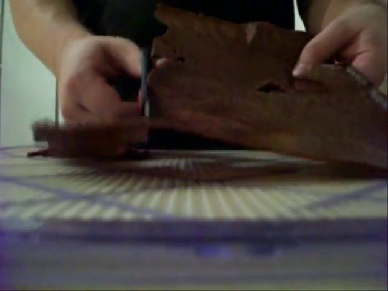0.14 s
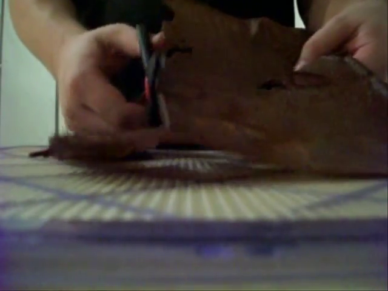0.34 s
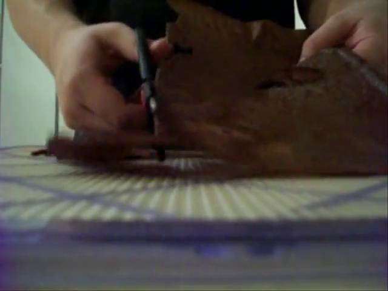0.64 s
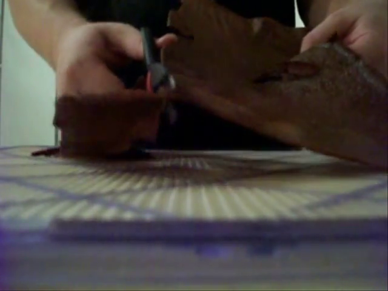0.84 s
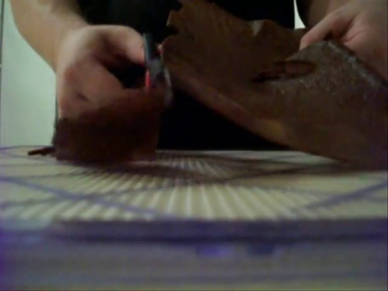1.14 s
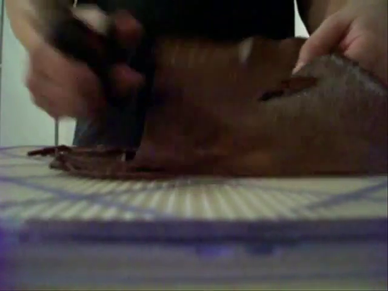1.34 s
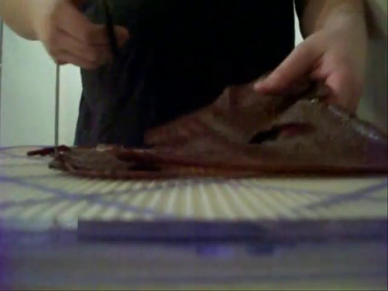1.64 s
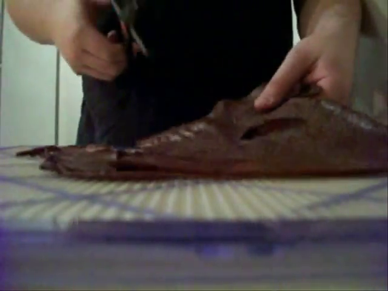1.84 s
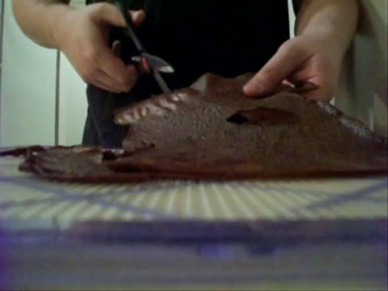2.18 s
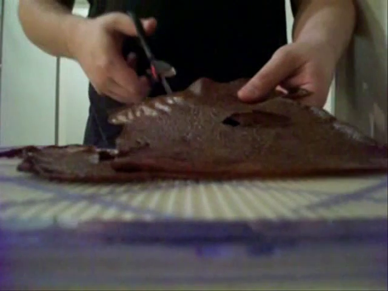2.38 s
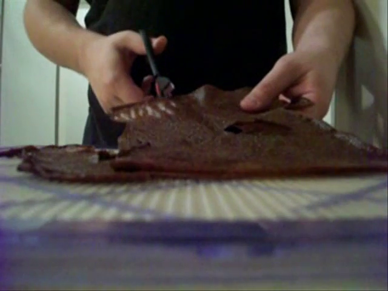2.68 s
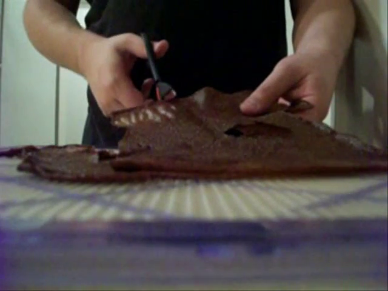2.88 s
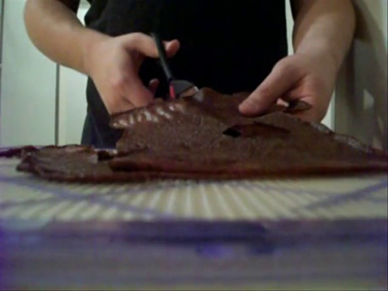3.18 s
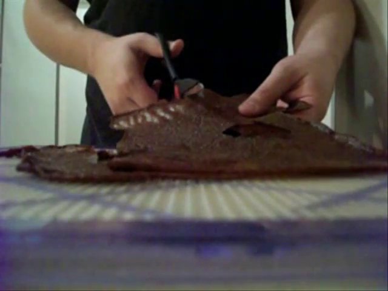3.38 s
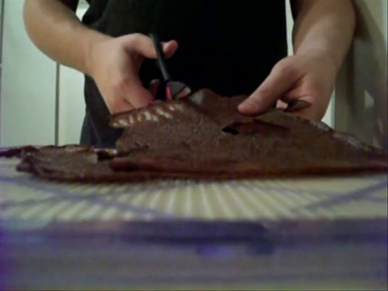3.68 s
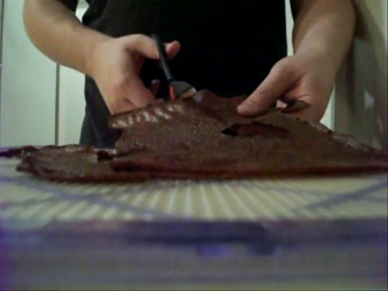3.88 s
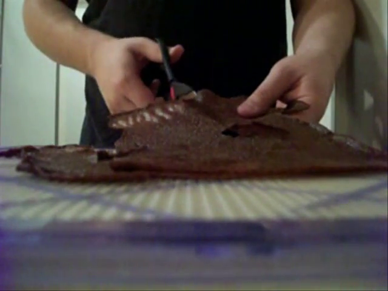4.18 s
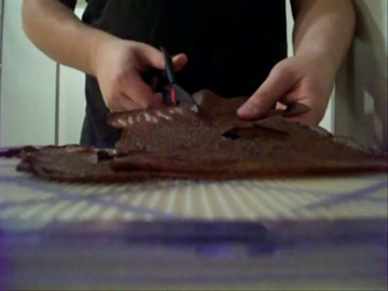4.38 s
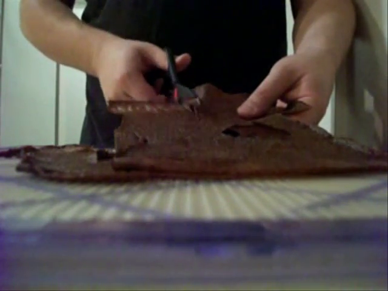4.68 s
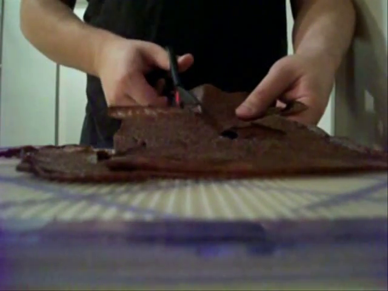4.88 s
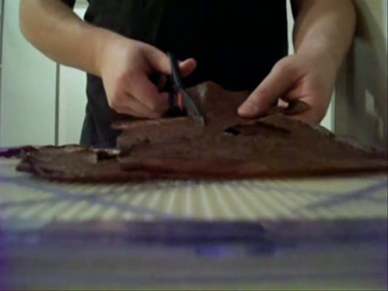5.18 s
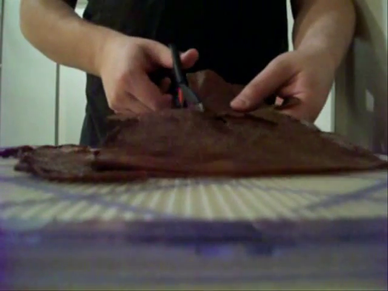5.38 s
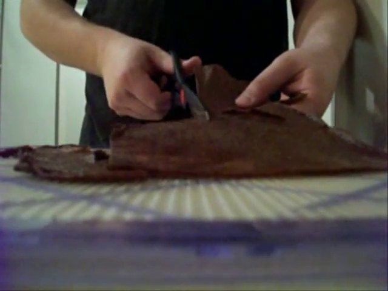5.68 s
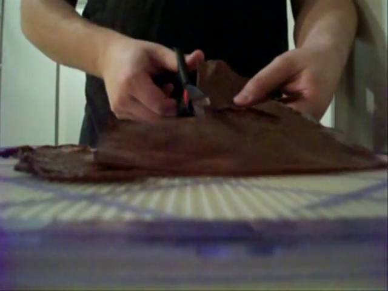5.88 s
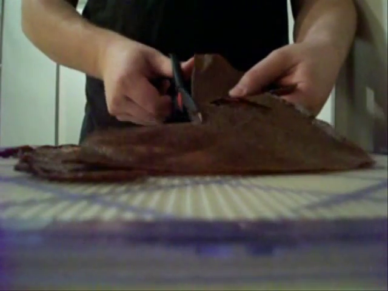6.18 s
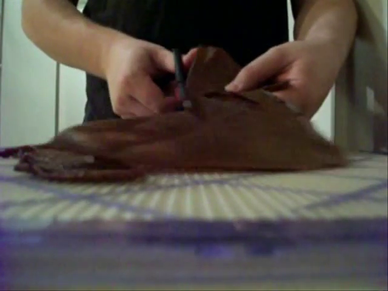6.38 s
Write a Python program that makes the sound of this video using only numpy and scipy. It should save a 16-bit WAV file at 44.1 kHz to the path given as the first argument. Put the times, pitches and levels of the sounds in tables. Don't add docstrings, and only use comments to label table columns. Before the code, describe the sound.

A close, muffled microphone in a small room picks up a steady dull hum with soft hiss. From 0 s a stiff dried fruit sheet rustles and open shears scrape it lightly, while the plastic tray bumps low. At 0.53 s the blades snap shut, so loud it distorts, and the tray drums deeply. A short, dry squeak of the pivot comes around 0.8 s. At 1.24 and 1.29 s two more hard clacks fall almost together with a softer tray slap. Light slides and bumps continue to about 2.3 s. Between 2.6 and 3.85 s, short crunchy bites part coarse fibres, separated by near quiet. At 4.36 s a rapid metallic scuff is followed by another bite at 4.5 s. From 5.1 s a hard tap leads into closely spaced gritty tearing cuts, steel scrapes, small ticks and low thumps until the end at 6.5 s.

```python
import sys
import numpy as np
from scipy import signal
from scipy.fft import rfft, irfft, next_fast_len
from scipy.io import wavfile
from scipy.ndimage import map_coordinates

SR = 44100
rng = np.random.default_rng(int(sys.argv[2]) if len(sys.argv) > 2 else 0)


def amplitude_ratio(level_db):
    exponent = np.asarray(level_db, float) / 20
    return 10 ** exponent


def file_out(sig):
    cols = np.atleast_2d(sig).T
    lim = np.clip(cols, -1, 1)
    pcm = np.round(lim * 32767).astype(np.int16)
    wavfile.write(sys.argv[1], SR, pcm)


N = 288193


def unit(x):
    return x / np.sqrt(np.mean(x ** 2) + 1e-20)


def along(points, hz):
    f, v = np.transpose(points)
    return np.interp(np.log(hz + 1), np.log(f + 1), v)


def curves(rows):
    s, *cols = np.transpose(rows)
    return [np.interp(np.arange(N) / SR, s, c) for c in cols]


def wobble(rate):
    knots = rng.standard_normal(int(N * rate / SR) + 4)
    return map_coordinates(knots, [np.arange(N) * rate / SR])


def filtered(x, response):
    m = next_fast_len(len(x) + 8192)
    return irfft(rfft(x, m) * response(np.fft.rfftfreq(m, 1 / SR)), m)[:len(x)]


def resonant(x, modes):
    def response(f):
        return sum((-1) ** k * amplitude_ratio(db) * 1j * f * width / (hz * hz - f * f + 1j * f * width)
                   for k, (hz, width, db) in enumerate(modes))
    return filtered(x, response)


def grit(rate, spread_db, clump_db):
    size_db = spread_db * np.minimum(rng.exponential(size=N), 3)
    breaks = rng.random(N) < rate / SR
    clicks = breaks * amplitude_ratio(size_db) * rng.standard_normal(N)
    rubbing = 0.69 * rng.standard_normal(N)
    return (unit(clicks) + rubbing) * amplitude_ratio(clump_db * wobble(90))


def swell(start, rise, fall, ends_db, bend=1):
    t = np.arange(N) / SR - start
    gate = np.clip(np.minimum(t / .003, 1 + (rise + fall - t) / .012), 0, 1)
    away = np.interp(t, [0, rise, rise + fall], [-1, 0, 1])
    return gate * amplitude_ratio(np.where(away < 0, *ends_db) * np.abs(away) ** bend)


def add(track, s, sound):
    part = track[round(s * SR):][:len(sound)]
    part += sound[:len(part)]


# (frequency [Hz], level [dB per Hz])
HUM = [(8.8, -36.5), (15, -1.5), (33, -12.5), (49, -9.5), (101, -21.5), (250, -24), (620, -34), (2000, -61)]
# (frequency [Hz], level [dB per Hz])
HISS = [(100, -51), (500, -34.5), (1200, -32.5), (2690, -34.5), (5200, -38.5)]


def room():
    def colour(hz):
        hum = amplitude_ratio(along(HUM, hz) - 40 * (hz < 12))
        return np.hypot(hum, amplitude_ratio(along(HISS, hz)))
    return amplitude_ratio(-34 + 0.22 * wobble(3.1)) * unit(filtered(rng.standard_normal(N), colour))


# (start [s], rise [s], fall [s], rubbing level [dB], steel over rubbing [dB])
SLIDES = [(0, 0.065, 0.017, -35, -5.5), (.075, 0.017, 0.055, -52.5, 10.5), (.16, 0.067, 0.13, -38, -1.5),
          (.345, 0.045, 0.045, -35, 2), (.45, 0.062, 0.018, -34, 5), (.535, 0.011, 0.16, -31, -2),
          (.64, 0.077, 0.16, -35, -1.5), (.905, 0.034, 0.031, -37, -3), (1.01, 0.045, 0.14, -38, -2.5),
          (1.298, 0.009, 0.15, -45.5, 6), (1.4, 0.095, .085, -41, -0.5), (1.77, .04, 0.085, -40.5, 0),
          (1.95, 0.057, 0.15, -40.5, 1), (2.148, 0.01, 0.024, -26.5, -7), (2.35, 0.052, 0.066, -42.5, 1),
          (4.398, 0.0064, 0.095, -43.5, 3), (4.66, 0.075, 0.33, -36.5, -2), (4.94, 0.073, 0.028, -40, -3),
          (5.766, 0.0073, 0.19, -39.5, -2)]
# (start [s], rise [s], fall [s], tearing level [dB], steel over tearing [dB])
CUTS = [
    (5.08, .06, 0.043, -40.5, -10),
    (5.254, 0.072, 0.022, -33.5, -5.5),
    (5.345, 0.053, 0.052, -33, -0.5),
    (5.455, 0.018, .063, -35.5, 1),
    (5.612, 0.039, 0.0197, -33, -6.5),
    (5.878, 0.044, 0.052, -33, -1.5),
    (5.955, 0.033, 0.093, -36, 0.5),
    (6.183, 0.017, 0.093, -36.5, -5),
    (6.375, 0.042, 0.064, -31, -5),
    (6.463, .032, 0.02, -34.5, 0.5),
]
# (frequency [Hz], width [Hz], level [dB])
SHEET = [(968, 420, -0.5), (1126, 193, 3.5), (1520, 108, 3.5), (1774, 89, 2), (2000, 304, -0.5)]
# (frequency [Hz], width [Hz], level [dB])
PIVOT = [(2377, 92, -2), (2883, 147, 1), (3070, 138, 1), (3642, 350, -0.5)]
# (frequency [Hz], width [Hz], level [dB])
EDGE = [(4020, 190, 1), (4570, 290, 6.5), (4640, 174, 7), (5554, 880, 0.5)]


def strokes():
    levels = np.zeros((3, N))
    for rows, ends_db, bend, pivot_db, edge_db in ((CUTS, (-6.5, -10), 1.25, 0, 3.5),
                                                   (SLIDES, (-13, -12), 0.99, -0.5, 0.5)):
        for s, rise, fall, db, steel_db in rows:
            gains = amplitude_ratio([[db], [db + steel_db + pivot_db], [db + steel_db + edge_db]])
            levels += swell(s, rise, fall, ends_db, bend) * gains
    fibres = grit(rate=1500, spread_db=-1.0, clump_db=1.5)
    steel = 0.4 * fibres + grit(rate=3000, spread_db=5.5, clump_db=2.0)
    sheet = resonant(resonant(fibres, SHEET), [(1420, 6400, 0)])
    pivot = resonant(resonant(steel, PIVOT), [(3220, 2800, 0)])
    edge = resonant(resonant(steel, EDGE), [(4670, 10000, 0)])
    return levels[0] * unit(sheet) + levels[1] * unit(pivot) + levels[2] * unit(edge)


# (time [s], level [dB])
WEIGHT = [(0, -36), (.5, -36), (.62, -30), (1.1, -38), (1.22, -37.5), (1.45, -39), (1.6, -41), (2.1, -35.5),
          (2.3, -43), (2.46, -38.5), (2.7, -45), (4.9, -41), (5.2, -44), (5.45, -39.5), (5.75, -46),
          (6.1, -39), (6.53, -38.5)]
# (start [s], rise [s], fall [s], drum level [dB], ribs over drum [dB])
BUMPS = [(.03, 0.03, 0.093, -35, -20), (0.319, 0.15, 0.098, -31, -3.5), (0.489, 0.03, .13, -31, 6),
         (.66, 0.037, 0.045, -35, 5), (0.799, .07, 0.091, -29.5, -8.5), (0.989, 0.092, 0.081, -30, -15),
         (1.232, 0.075, 0.09, -29.5, 3.5), (1.41, .03, 0.058, -40.5, 8.5), (1.46, 0.04, 0.046, -30, -13),
         (1.78, 0.053, 0.086, -28.5, -13), (2.09, 0.089, 0.044, -28.5, -23), (4.36, 0.033, .06, -40, 2.5),
         (4.96, 0.066, 0.024, -32, -5), (5.07, 0.011, 0.067, -41.5, 11), (5.279, 0.11, 0.12, -27.5, -9.5),
         (5.48, 0.052, 0.024, -25.5, -13), (5.63, 0.045, 0.03, -27, -18), (5.76, 0.039, 0.091, -33, -8),
         (5.88, .03, 0.05, -26, -1), (6, 0.016, 0.039, -22, -8.5), (6.04, 0.077, 0.053, -31, -19),
         (6.17, 0.047, 0.073, -41.5, 8), (6.22, 0.049, 0.042, -34, -0.5), (6.361, 0.067, 0.12, -34, 3.5)]
# (frequency [Hz], width [Hz], level [dB])
DRUM = [(85.6, 20.3, 4), (122.2, 45, -6)]
# (frequency [Hz], width [Hz], level [dB])
FLAP = [(155, 66, -1), (290, 61, -4.5)]
# (frequency [Hz], width [Hz], level [dB])
RIBS = [(424.4, 33, 0.5), (773.7, 13, -0.5), (1132.4, 6.5, 1), (580, 1100, -12)]


def drag():
    weight_db, = curves(WEIGHT)
    levels = amplitude_ratio([weight_db, weight_db - 8, weight_db - 5.5])
    for s, rise, fall, db, ribs_db in BUMPS:
        gains = amplitude_ratio([[db], [db - 5 + 0.53 * ribs_db], [db + ribs_db]])
        levels = np.hypot(levels, swell(s, rise, fall, ends_db=(-9, -10.5)) * gains)
    drum = resonant(resonant(rng.standard_normal(N), DRUM), [(100, 300, 0)])
    flap = resonant(resonant(rng.standard_normal(N), FLAP), [(199, 660, 0)])
    ribs = resonant(grit(rate=1500, spread_db=5.5, clump_db=2.5), RIBS)
    return levels[0] * unit(drum) + levels[1] * unit(flap) + levels[2] * unit(ribs)


# (time [s], peak level [dB], brightness [dB a step from tray to sheet to pivot to tips])
TRAY_TAPS = [
    (.349, -25.5, -1),
    (.91, -26, 4),
    (1.297, -16.5, -0.5),
    (1.367, -26, -3),
    (2.156, -25, -0.5),
    (5.081, -15.5, -0.5),
    (5.1, -27, 0),
    (5.466, -30.5, -3),
]
FIBRE_SNAGS = [(1.337, -24.5, 8.5), (1.651, -30.5, 5), (2.596, -33.5, -3), (2.742, -32, 5), (2.986, -38, 2),
               (3.014, -36, 14), (3.062, -28, 4), (3.558, -29.5, 5), (3.614, -29, 7.5), (3.625, -39, 5),
               (3.662, -34, -6), (3.754, -34, -3), (5.122, -27, 11.5), (5.131, -22.5, 3), (5.4, -25, 5),
               (5.654, -29, 4), (6.014, -24, 5), (6.414, -18, 5.5), (6.431, -21, 5), (6.2, -28, -6)]
BLADE_NICKS = [
    (.487, -37, -3),
    (.658, -18.5, 9),
    (1.263, -18.5, -3),
    (3.388, -44, -3),
    (4.111, -25, -4),
    (4.268, -29.5, 1),
    (4.532, -45, -1),
    (5.344, -33.5, -4),
    (5.621, -20.5, -2.5),
    (5.769, -37, 0),
]
BLADE_SCUFFS = [
    (4.358, -17, 0.5),
    (4.374, -22, 1),
    (4.383, -19.5, 0),
    (4.394, -16, 3),
]
# (frequency [Hz], width [Hz], level [dB])
KNOCK = [(463, 16, -7.5), (833, 19, -0.5)]


def ticks():
    out, t = np.zeros(N), np.arange(SR // 16) / SR
    nick_db = (-25.5, -11, -8, 2)
    for rows, shares_db, hold, t60 in ((TRAY_TAPS, (-3, -7, -11, -1.5), .002, .014),
                                       (FIBRE_SNAGS, (-5, 1, -9, -18.5), .0015, .008),
                                       (BLADE_NICKS, nick_db, .0012, .008),
                                       (BLADE_SCUFFS, nick_db, .004, .014)):
        shape = np.minimum(t / .0004, 1) * amplitude_ratio(-60 * np.maximum(t - hold, 0) / t60)
        for s, db, bright_db in rows:
            puff = shape * np.sign(rng.standard_normal(len(t)))
            for k, body in enumerate((KNOCK, SHEET, PIVOT, EDGE)):
                ring = resonant(puff, body)
                step = k - np.argmax(shares_db)
                level = amplitude_ratio(db + shares_db[k] + step * bright_db - 7.5)
                add(out, s - .002, level * ring / np.std(ring[:SR // 150]))
    return out


# (time [s], peak level [dB], rise [s], rattle level [dB], share into the tray [ratio])
SNAPS = [
    (.5286, 2.8, .0004, -24, 2.4),
    (1.2432, -.4, .0055, -14, .4),
    (1.2868, -1.5, .0045, -19, 1.6),
]
# (frequency [Hz], width [Hz], level [dB])
THUD = [(767, 147, 2), (1170, 49, -1.5), (1296, 700, -8.5), (2100, 170, -8)]


def snaps():
    out, t = np.zeros(N), np.arange(SR // 3) / SR
    snap_t60_s, rattle_t60_s, ring_t60_s, thud_t60_s = .015, 0.29, 0.2, .028
    for s, db, rise, rattle_db, tray in SNAPS:
        after = np.maximum(t - rise, 0)
        fading = amplitude_ratio(-60 * after / snap_t60_s) + amplitude_ratio(rattle_db - 60 * after / rattle_t60_s)
        burst = np.sqrt(np.minimum(t / rise, 1)) * fading * np.sign(rng.standard_normal(len(t)))
        crack = unit(resonant(burst, EDGE + [(2224, 770, 0), (5840, 700, -1.1)]))
        crack = crack + (.2 + .25 * tray) * unit(resonant(burst, PIVOT))
        crack = crack + 0.81 * tray * unit(resonant(burst, THUD))
        ring = sum(amplitude_ratio(-27 + level - 60 * t / ring_t60_s) * np.sin(2 * np.pi * hz * t)
                   for hz, _, level in RIBS[:3])
        thud = sum(amplitude_ratio(-17 + level - 60 * after / thud_t60_s) * np.sin(2 * np.pi * hz * after)
                   for hz, _, level in THUD[:2])
        blow = crack / np.abs(crack).max() + tray * (ring / (1 + rise / .002) + thud)
        add(out, s, amplitude_ratio(db) * blow / np.abs(blow).max())
    return out


# (time [s], peak level [dB])
SLAPS = [
    (.5357, -7.5),
    (1.2958, -10.5),
]


def slaps():
    out, t = np.zeros(N), np.arange(SR // 3) / SR
    hold_s, lift_s, lift_db, t60_s = .048, .008, -6.5, .4
    drop_db = np.interp(t, [0, hold_s, hold_s + lift_s], [0, 0, lift_db])
    shape = (1 - np.exp(-t / 0.0013)) * amplitude_ratio(drop_db - 60 * np.maximum(t - hold_s, 0) / t60_s)
    tones = sum(amplitude_ratio(db) * np.sin(2 * np.pi * hz * t) for hz, db in ((88, 0), (171, -15), (138, -17)))
    for s, db in SLAPS:
        add(out, s, amplitude_ratio(db) * shape * tones)
    return out


# (start [s], rise [s], fall [s], level [dB])
CHAFES = [
    (.8, .006, .012, -41),
    (.818, .003, 0.024, -27.5),
    (.851, .004, 0.023, -30),
]
# (frequency [Hz], width [Hz], level [dB])
SQUEAK = [(2460, 130, -8), (2950, 50, 0), (3390, 100, 0), (3790, 120, -10), (4500, 400, -13)]


def squeak():
    level = sum(amplitude_ratio(db) * swell(s, rise, fall, ends_db=(-2, -4.5)) for s, rise, fall, db in CHAFES)
    return level * unit(resonant(grit(rate=2700, spread_db=1.5, clump_db=2.5), SQUEAK))


# (start [s], rise [s], fall [s], tearing level [dB], steel over tearing [dB])
CRUNCHES = [
    (2.591, 0.051, 0.053, -36.5, 0.5),
    (2.737, .005, 0.032, -38.5, -0.5),
    (2.982, 0.042, 0.014, -29, -6.5),
    (3.03, 0.043, 0.066, -31.5, -4.5),
    (3.378, 0.014, 0.032, -30, -6.5),
    (3.438, 0.034, 0.018, -28, -5),
    (3.491, .005, 0.039, -40, -5),
    (3.61, 0.051, 0.043, -31.5, -5.5),
    (3.795, 0.028, 0.027, -30, -4.5),
    (4.489, 0.015, .03, -31.5, -3.5),
]
# (frequency [Hz], width [Hz], level [dB])
JAWS = [(2960, 890, 10), (3570, 50, -5)]
# (frequency [Hz], width [Hz], level [dB])
TIPS = [(4020, 170, 3), (4760, 650, -4.5), (6120, 760, -1)]


def crunches():
    levels = np.zeros((2, N))
    for s, rise, fall, db, steel_db in CRUNCHES:
        levels += swell(s, rise, fall, ends_db=(-7, -6), bend=1.9) * amplitude_ratio([[db], [db + steel_db]])
    fibres = grit(rate=900, spread_db=2, clump_db=1.2)
    slack, taut = (unit(resonant(fibres, [(hz * pitch, width, db) for hz, width, db in SHEET]))
                   for pitch in (.92, 1.06))
    turn = np.pi / 4 * (1 + np.tanh(3.0 * wobble(22)))
    sheet = resonant(np.cos(turn) * slack + np.sin(turn) * taut, [(1430, 2000, 0)])
    jaws = resonant(resonant(fibres, JAWS), [(3300, 540, 0)])
    tips = resonant(resonant(fibres, TIPS), [(4940, 4300, 0)])
    steel = amplitude_ratio(-0.5) * unit(jaws) + amplitude_ratio(-0.5) * unit(tips)
    return levels[0] * unit(sheet) + levels[1] * steel


def scene():
    return (room() + strokes() + drag() + ticks() + snaps() + slaps() + squeak() + crunches())[None]


def top_cut(x):
    return signal.sosfilt(signal.butter(12, 12400, fs=SR, output="sos"), x)


# (frequency [Hz], gain [dB])
MICROPHONE = [(20, -5), (4900, 3), (5500, -6.5), (6200, -11.5), (6700, -20), (7100, -37.5), (7500, -70.5),
              (22000, -85)]


def record(dry):
    x = filtered(dry[0], lambda hz: amplitude_ratio(along(MICROPHONE, hz))) - .0617
    x = x + amplitude_ratio(-86) * np.sin(np.pi * np.arange(N) / 2 + 1)
    return top_cut(np.clip(x, -1, 1)[None])


dry = scene()
out = record(dry)
file_out(out)
```